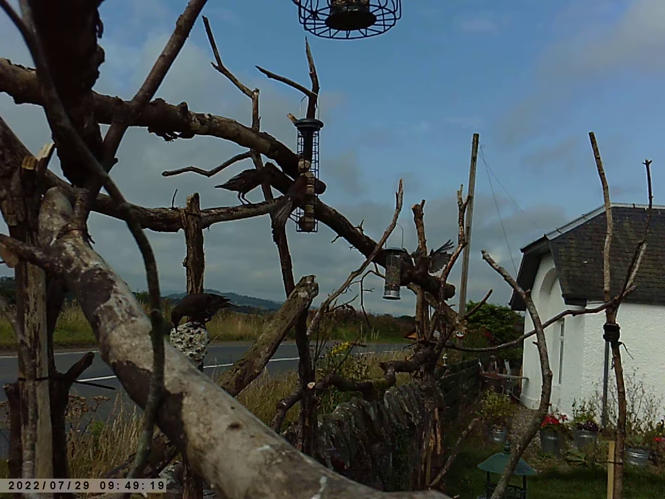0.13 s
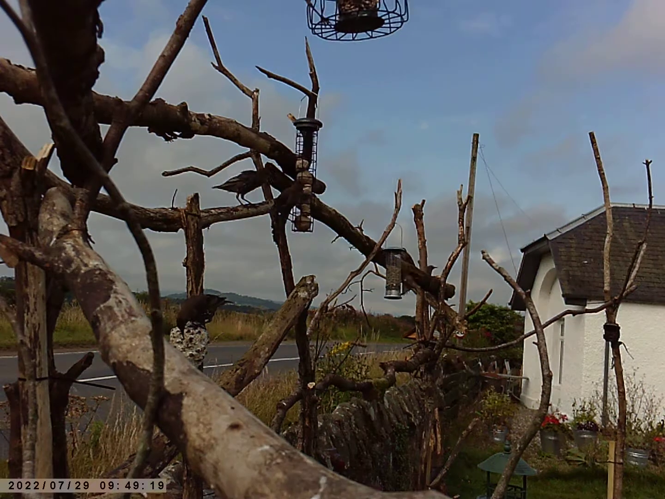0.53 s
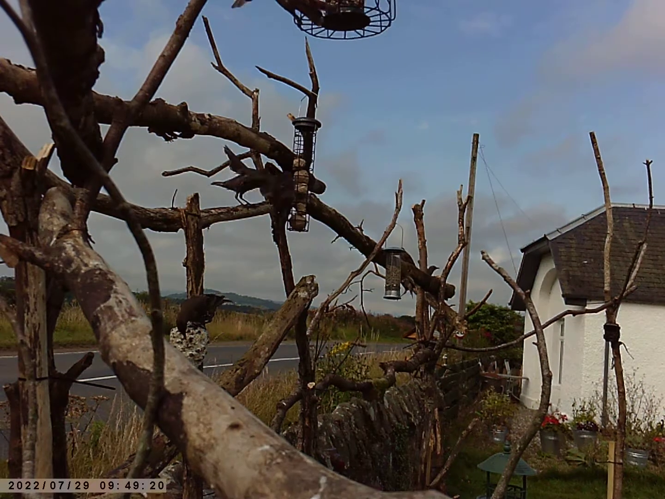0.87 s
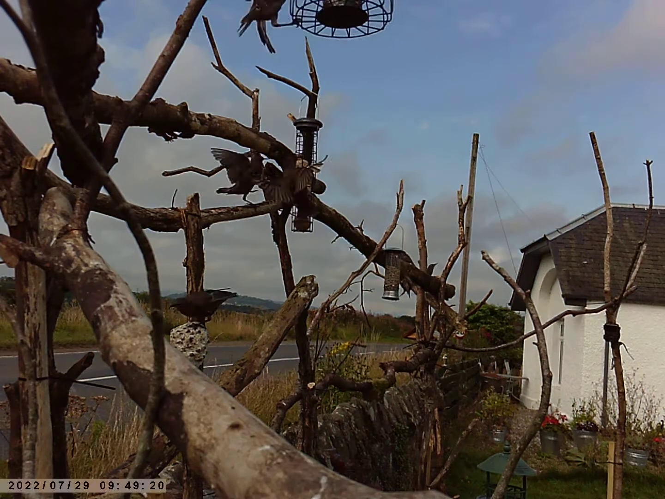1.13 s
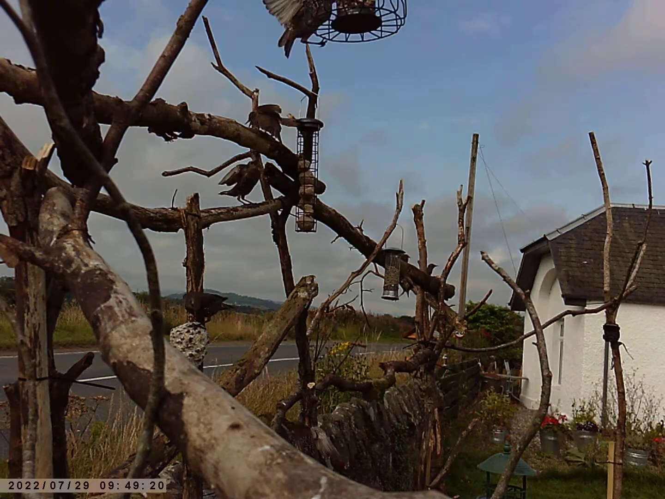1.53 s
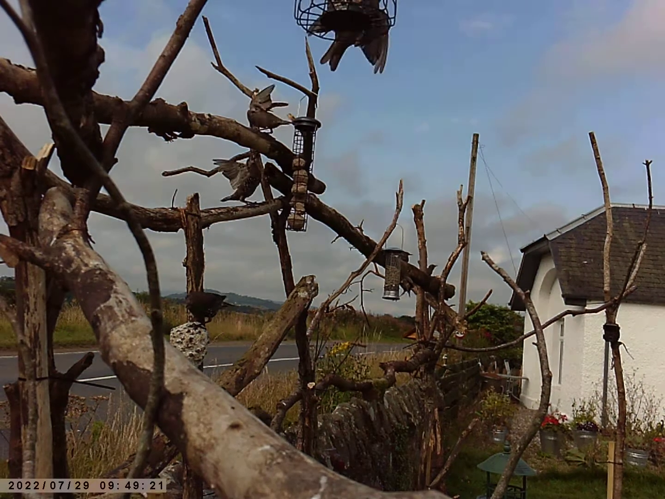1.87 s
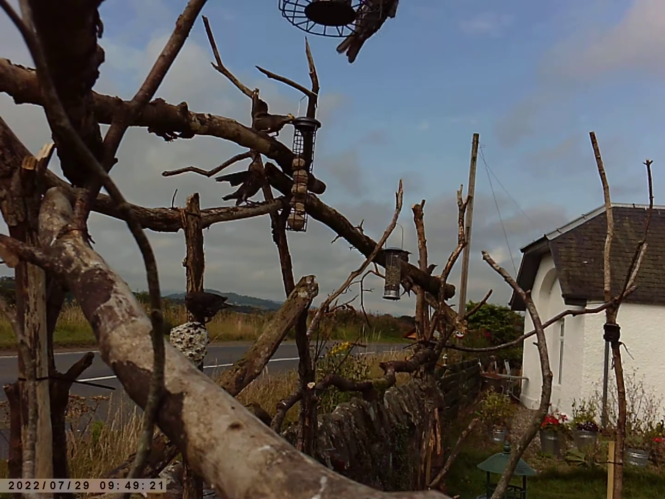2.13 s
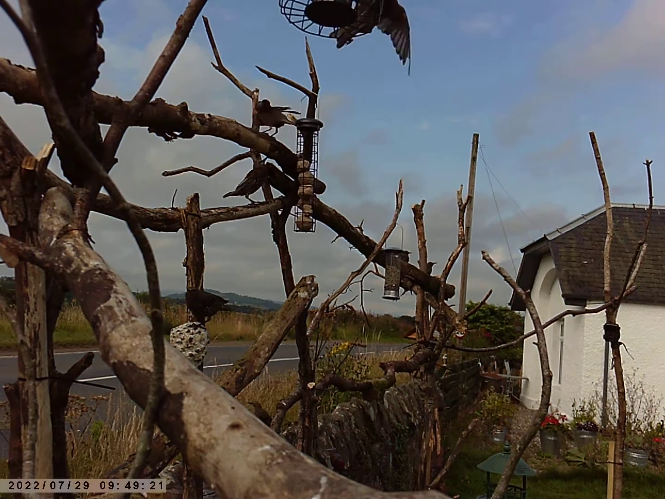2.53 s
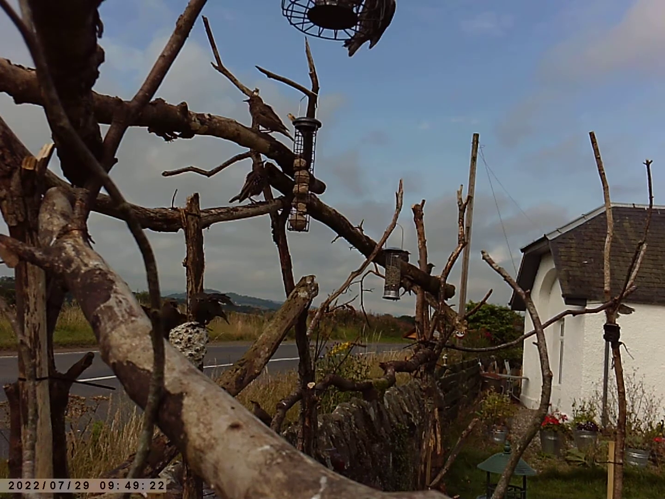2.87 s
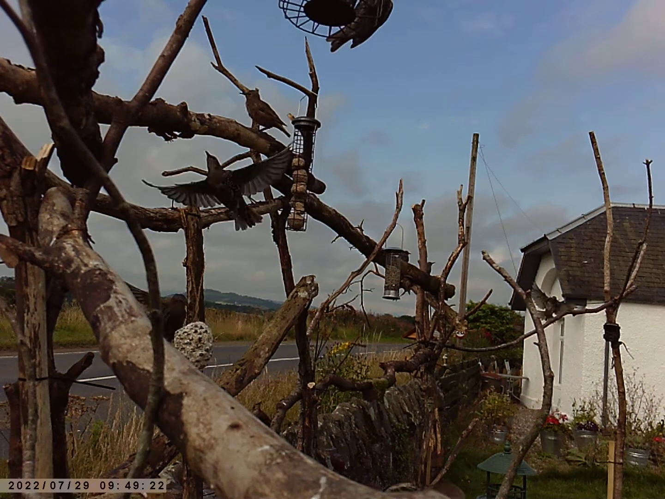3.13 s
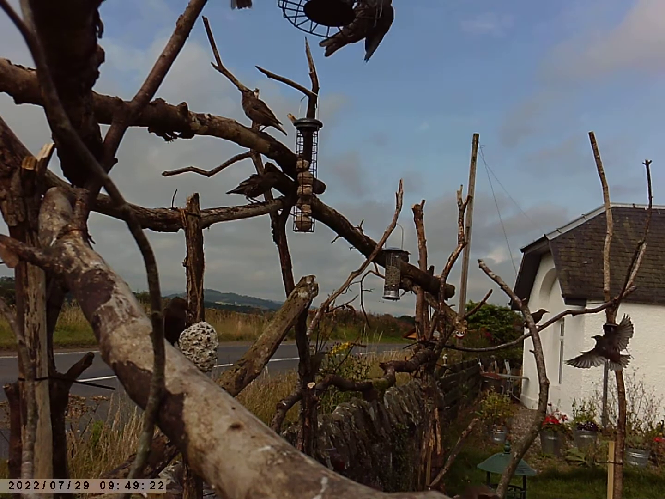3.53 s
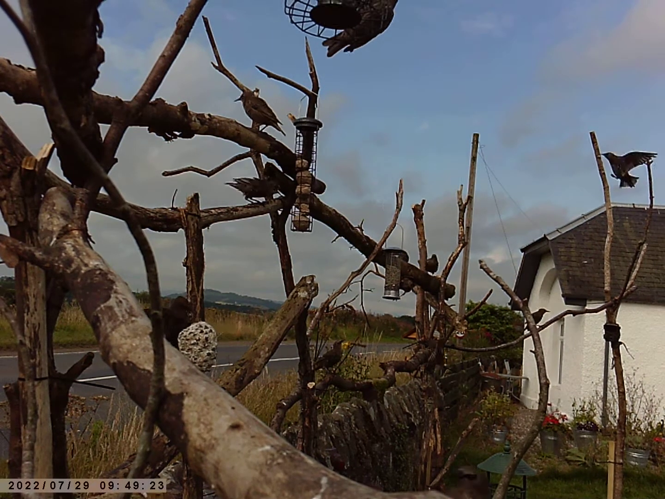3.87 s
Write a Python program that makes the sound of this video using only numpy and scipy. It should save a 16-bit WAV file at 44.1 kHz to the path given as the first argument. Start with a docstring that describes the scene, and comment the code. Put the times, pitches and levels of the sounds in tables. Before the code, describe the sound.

Starlings squeal, chatter and rasp at garden feeders over wing flutter, bumps and low wind rumble

```python
"""Starlings squabbling at a camera

Sliding, warbling squeals, scratchy chatter, rattling rasps and hoarse squawks, shaped from tones and noise;
all but the squawks ring the air resonances of a small camera's housing. Bumps and wing flutter ring modes
of its mount; puffs, rustles, ticks and wind add low pulses, noise swells and snaps.
Under it lie distant traffic, hiss and paired bursts of electrical buzz. The microphone starts with a pop."""
import sys
import numpy as np
from scipy import signal
from scipy.fft import rfft, irfft
from scipy.io import wavfile
from scipy.ndimage import uniform_filter1d

SR = 44100
rng = np.random.default_rng(int(sys.argv[2]) if len(sys.argv) > 2 else 0)


def generate_wav(signal):
    """Clip the signal to [-1, 1] and save it as 16-bit WAV at the path in sys.argv[1]."""
    frames = np.transpose(np.atleast_2d(signal))
    scaled = np.clip(frames, -1, 1) * 32767
    pcm = np.round(scaled).astype(np.int16)
    wavfile.write(sys.argv[1], SR, pcm)


N = 176400
T = np.arange(N) / SR
EDGE_HZ = 15900  # top of the recorded band
NOTE_TOP_HZ = 2470  # chatter's nominal top pitch, rasps' mean pitch

# modes of the camera mount: centre_hz, width_hz, level_db
MOUNT = [(87, 18, 3.5), (203.2, 28, 1), (247, 65, -13), (301, 46, -10), (345.5, 23, -20.5),
         (476.3, 46, -23.5)]


def amp(db):
    """Decibels to gain."""
    return 10 ** (np.asarray(db) / 20)


def unit(x):
    """Scales to rms 1."""
    return x / np.sqrt(np.mean(x ** 2) + 1e-20)


def add(mix, start_s, sound):
    """Mixes a sound in at a time, cut at the end of the mix."""
    part = mix[max(round(start_s * SR), 0):][:len(sound)]
    part += sound[:len(part)]


def level_curve(points):
    """Gain over the scene, interpolated in dB between (s, dB) points."""
    return amp(np.interp(T, *np.transpose(points)))


def noise(colour):
    """Noise of rms 1 with a spectrum given as (Hz, dB) points."""
    point_hz, point_db = np.transpose(colour)
    hz = np.fft.rfftfreq(N, 1 / SR)
    gain = amp(np.interp(np.log(hz + 1), np.log(point_hz), point_db))
    return unit(irfft(rfft(rng.standard_normal(N)) * gain, N))


def wander(size, rate_hz):
    """Smooth random motion, cut from half a second of rms 1."""
    hz = np.arange(SR // 4 + 1) * 2
    spectrum = rfft(rng.standard_normal(SR // 2)) * np.exp(-(hz / rate_hz) ** 2)
    return unit(irfft(spectrum))[:size]


def turn(hz):
    """Running phase of a pitch curve."""
    return 2 * np.pi * np.cumsum(hz) / SR


def resonate(x, hz, width_hz):
    """Fixed or moving resonance: shift to zero frequency, smooth, shift back."""
    carrier = np.exp(1j * turn(hz * np.ones(len(x))))
    pole = np.exp(-np.pi * width_hz / SR)
    return 2 * (carrier * signal.lfilter([1 - pole], [1, -pole], x / carrier)).real


def ring(x, modes):
    """Parallel peak filters, one per mode."""
    return sum(amp(db) * signal.lfilter(*signal.iirpeak(hz, hz / width_hz, SR), x)
               for hz, width_hz, db in modes)


def lowpass(x, hz, order=2):
    """Butterworth treble cut."""
    return signal.sosfilt(signal.butter(order, hz, fs=SR, output="sos"), x)


def housed(x):
    """Air resonances of the camera housing, plus a little direct sound."""
    # centre_hz, width_hz, level_db
    housing_modes = [(3630, 220, -5.5), (5094, 255, 6), (6245, 120, -4.5), (7960, 230, -12.5)]
    direct_db = -28
    return ring(x, housing_modes) + amp(direct_db) * x


def garden(x, wet_db=-20, t60_s=0.18):
    """Faint scatter from branches and a wall: convolution with a decaying noise tail."""
    t = np.arange(SR // 3) / SR
    tail = rng.standard_normal(len(t)) * amp(-60 * t / t60_s) * (t > .003)
    return x + amp(wet_db) * signal.fftconvolve(x, tail / np.linalg.norm(tail))[:N]


def air():
    """Distant traffic and steady hiss as one coloured noise."""
    # spectrum: freq_hz, level_db
    air_colour = [(59, -27), (100, 1.5), (218, -14), (370, -25.5), (429, -33), (791, -43.5), (1370, -40.5),
                  (3390, -49), (5170, -51), (15500, -61.5)]
    treble_db = -67.5  # rms of the part above 700 Hz
    x = noise(air_colour)
    treble = signal.sosfilt(signal.butter(6, 700, "high", fs=SR, output="sos"), x)
    return amp(treble_db) * x / treble.std()


def buzz():
    """The camera's electronics: harmonics and hiss gated in two bursts per cycle."""
    # spectrum: freq_hz, level_db
    buzz_colour = [(700, 12), (2500, -7), (3500, 9.5), (4400, -2), (6500, 3), (9000, -3), (15000, -1)]
    starts_s, cycle_s, burst_s = (.547, 0.75), .6667, .1
    base_hz, lines_db, hiss_db = 692, -70, -66.5
    gate = sum((T > s) * ((T - s) % cycle_s < burst_s) for s in starts_s)
    lines = np.zeros(N)
    for k in range(2, 22):
        gain = amp(np.interp(k * base_hz, *np.transpose(buzz_colour)))
        lines += gain * np.sin(2 * np.pi * (k * base_hz * T + rng.random()))
    return gate * (amp(lines_db) * unit(lines) + amp(hiss_db) * noise(buzz_colour))


def wind():
    """Wind on the microphone: low coloured noise that swells and sinks."""
    # time_s, level_db before trim
    wind_points = [(0.15, -24.5), (0.66, -24), (1.04, -18.5), (1.3, -25), (1.46, -38), (2.5, -36.5),
                   (2.72, -28.5), (3.17, -40.5), (3.5, -32.5), (3.86, -31)]
    # spectrum: freq_hz, level_db
    wind_colour = [(15, 0.5), (30, -7), (60, 0.5), (88, 4.5), (125, -13), (180, -18), (400, -56.5),
                   (900, -79)]
    trim_db = -1.5
    return amp(trim_db) * level_curve(wind_points) * noise(wind_colour)


def flutter():
    """Wing flutter shaking the mount: unevenly beating noise plus noise-driven modes."""
    # time_s, level_db before the shares below
    flutter_points = [(0.11, -27), (0.29, -51.5), (0.4, -40), (0.57, -53.5), (0.82, -34), (1.22, -30),
                      (1.4, -41.5), (1.54, -35), (1.69, -44), (1.8, -31), (1.98, -46.5), (2.2, -36),
                      (2.35, -45), (2.6, -37), (2.97, -45.5), (3.22, -58), (3.26, -37.5), (3.6, -34),
                      (3.97, -36.5)]
    # spectrum: freq_hz, level_db
    flutter_colour = [(40, 3.5), (150, 5), (240, 0), (380, -16), (520, -21.5), (800, -37.5), (1500, -39.5),
                      (4000, -62)]
    noise_db, boom_db = -5, -3
    uneven_db, uneven_cutoff_hz = 5, 26.1
    beats = unit(lowpass(rng.standard_normal(N), uneven_cutoff_hz, order=4))
    force = rng.standard_normal(N)
    boom = np.zeros(N)
    for hz, width_hz, db in MOUNT:
        boom += amp(db) * unit(resonate(resonate(force, hz, width_hz), hz, width_hz))
    beating = amp(noise_db + uneven_db * beats) * noise(flutter_colour)
    return level_curve(flutter_points) * (beating + amp(boom_db) * unit(boom))


def drone():
    """A bird settles on the mount; its modes hum on with wandering level and pitch."""
    # freq_hz, level_db before the shake level
    drone_modes = [(92, 1.5), (204, -4.5), (349, -12.5), (472, -25.5)]
    start_s, shake_db, t60_s, rise_s = 3.575, -24, 2.5, 0.0077
    t = np.arange(0, min(T[-1] - start_s + .02, .49), 1 / SR)
    hum = np.zeros(len(t))
    for hz, db in drone_modes:
        swell = 1 + .5 * wander(len(t), 24)
        hum += amp(db) * swell * np.sin(turn(hz + 9 * wander(len(t), 51)))
    return start_s, hum * np.minimum(t / rise_s, 1) * amp(shake_db - 60 * t / t60_s)


def rustle(middle_s, half_length_s, db, hz, order=4):
    """Feathers brushing past: a soft swell of band-limited noise."""
    spread = 1.312  # band edges as ratios over and under the centre
    t = np.arange(-half_length_s, half_length_s, 1 / SR)
    band = signal.butter(order, [hz / spread, hz * spread], "band", fs=SR, output="sos")
    # first half lets the filter settle
    rush = signal.sosfilt(band, rng.standard_normal(2 * len(t)))[len(t):]
    swell = np.cos(np.pi * t / half_length_s / 2) ** 2
    return middle_s - half_length_s, amp(db) * unit(rush * swell) * np.sqrt(.5)


def puff(middle_s, half_length_s, db, hz):
    """Air pressure from a wing beat: a low cosine under a smooth bell."""
    trim_db = 1.5
    t = np.arange(-half_length_s, half_length_s, 1 / SR)
    bell = np.cos(np.pi * t / half_length_s / 2) ** 4
    return middle_s - half_length_s, amp(db + trim_db) * bell * np.cos(2 * np.pi * hz * t)


def tick(start_s, db):
    """Claw or beak: a tiny hard snap with a noisy tail, heard direct and through the housing."""
    t = np.arange(300) / SR
    snap = np.exp(-t / .00006) + 0.089 * np.exp(-t / 0.00045) * rng.standard_normal(len(t))
    return start_s, amp(db) * (snap + housed(snap))


def bump(time_s, db, hz):
    """Bird bumping the mount: a sine thud with a dull noise scuff, ringing its modes."""
    rise_s, ring_db, scuff_db = 0.0049, -23, -17.5
    t = np.arange(SR // 5) / SR
    shape = t / rise_s * np.exp(1 - t / rise_s)
    scuff = shape * unit(lowpass(rng.standard_normal(len(t)), 430, order=3))
    thud = shape * np.sin(2 * np.pi * hz * t) + amp(scuff_db) * scuff
    return time_s - .004, amp(db) * (thud + amp(ring_db) * ring(thud, MOUNT))


def squawk(start_s, length_s, first_hz, last_hz, db):
    """A quavering tone slides alongside rasping noise that rings a sliding throat resonance."""
    width_hz, hiss_db, trim_db = 560, -11, 5.5
    u = np.linspace(0, 1, int(length_s * SR))
    breath = rng.standard_normal(len(u)) * amp(2.1 * wander(len(u), 200))
    hz = first_hz + (last_hz - first_hz) * u
    throat = unit(resonate(resonate(breath, hz, width_hz), hz, width_hz))
    hiss = amp(hiss_db) * unit(lowpass(breath, 4000))
    tone = 2 * np.sin(turn(hz * (1 + .035 * wander(len(u), 300))))
    swell = np.sqrt(abs(np.sin(np.pi * u)))
    return start_s, amp(db + trim_db) * unit((throat + hiss + tone) * swell)


def rasp(start_s, length_s, db):
    """Hoarse rattle: uneven pulses of breath and a lurching tone through throat and housing."""
    # centre_hz, width_hz, level_db
    throat_modes = [(1370, 330, -5), (2460, 470, -6)]
    pulses_per_s, pulse_uneven, pitch_swing, spray_db = 130, .3, 0.077, -29
    u = np.linspace(0, 1, int(length_s * SR))
    pulses = np.exp(np.cos(turn(pulses_per_s * (1 + pulse_uneven * wander(len(u), 200)))))
    phase = turn(NOTE_TOP_HZ * (1 + pitch_swing * wander(len(u), 284)))
    tone = .5 * (np.sin(phase) + np.sin(2 * phase))
    breath = pulses * (rng.standard_normal(len(u)) + tone)
    voice = housed(breath) + ring(breath, throat_modes) + amp(spray_db) * breath
    return start_s, amp(db) * unit(voice * np.sqrt(abs(np.sin(np.pi * u))))


def note(start_s, length_s, db):
    """Scratchy chatter: an arched, sagging pitch whose strong second harmonic rings the housing."""
    # one entry per harmonic from the first: level_db
    harmonics = [-5, 0, -19.5, -27]
    scatter, arch_depth, sag, jitter = 0.051, 0.205, 0.11, 0.067  # shares of pitch
    noise_gain, rattle_db = 0.47, 4.5
    u = np.linspace(0, 1, int((length_s + 0.0059) * SR))
    arch = np.sin(np.pi * u)
    top_hz = NOTE_TOP_HZ * (1 + scatter * rng.uniform(-0.96, 1))
    bend = 1 - arch_depth * (1 - arch) - sag * (u - .5) + jitter * wander(len(u), 400)
    phase = turn(top_hz * bend)
    voice = noise_gain * rng.standard_normal(len(u))
    for k, harmonic_db in enumerate(harmonics, 1):
        voice += amp(harmonic_db) * np.sin(k * phase)
    rattle = amp(rattle_db * wander(len(u), 520))
    return start_s - .003, amp(db) * unit(housed(voice * arch * rattle))


def squeal(warble_hz, harsh_s, points):
    """A sliding whistle: harsh onset, then clear and warbling, rougher again near its top pitch."""
    rough_start, rough_clear, rough_high, strain_hz = .85, 0.14, 0.58, 8350  # roughness 0-1
    warble_per_s, warble_uneven = 92, .14
    jitter_hz, rough_jitter_hz = 45.5, 900
    edge_s, overtone_db, trim_db = 0.0019, -31, -0.5
    point_s, point_hz, point_db = np.transpose(points)
    t = np.arange(point_s[0], point_s[-1], 1 / SR)
    n = len(t)
    glide_hz = np.interp(t, point_s, point_hz)
    harsh = rough_start * np.clip((t[0] + harsh_s - t) / 0.0041 + .5, 0, 1)
    strain = rough_clear + rough_high * (glide_hz / strain_hz) ** 10
    rough = np.clip(np.maximum(harsh, strain), 0, 1)
    warble = np.sin(turn(warble_per_s * (1 + warble_uneven * wander(n, 60))))
    pitch_hz = glide_hz + warble_hz * (1 - rough) * warble
    pitch_hz += jitter_hz * wander(n, 300) + rough_jitter_hz * rough ** 2 * wander(n, 1100)
    phase = turn(pitch_hz)
    voice = housed((1 - 0.43 * rough) * np.sin(phase) + 0.92 * rough * rng.standard_normal(n))
    # even out the resonances so the level curve rules
    voice /= np.sqrt(abs(uniform_filter1d(voice ** 2, size=600)) + 1e-12)
    overtone = amp(overtone_db) * np.sin(2 * phase) * (pitch_hz < EDGE_HZ / 2)
    edge = np.clip(np.minimum(t - t[0], t[-1] - t) / edge_s, 0, 1)
    level = amp(np.interp(t, point_s, point_db) + trim_db + 1.26 * wander(n, 160))
    return point_s[0], edge * level * (voice + overtone)


def scene():
    """Background, knocks and wing sounds, and birds with a faint garden echo."""
    # feathers brushing past: middle_s, half_length_s, level_db before a 3 dB cut, centre_hz
    rustles = [(0.482, 0.03, -52.5, 417), (0.677, 0.032, -45.5, 289), (1.15, 0.063, -41, 290),
               (1.526, 0.048, -50, 440), (3.061, .06, -44.5, 251), (3.414, .06, -31.5, 199.4),
               (3.494, .06, -36, 227)]
    # wing-beat puffs: middle_s, half_length_s, level_db before trim, pitch_hz
    puffs = [(.084, 0.038, -8.5, 61.6), (.21, 0.031, -21.5, 89), (0.362, 0.046, -25, 64.3),
             (.54, 0.057, -18.5, 88.6), (0.787, 0.028, -12, 44), (0.829, 0.024, -13, 81),
             (0.964, 0.051, -7.5, 48.3), (1.195, 0.068, -13.5, 88.4), (1.185, 0.045, -18.5, 201),
             (2.22, 0.083, -29, 135), (2.385, 0.022, -23, 59.3), (2.58, 0.039, -21.5, 84)]
    # claw and beak ticks: start_s, snap_level_db
    ticks = [(.947, -36), (0.97, -31), (0.9745, -32.5), (2.293, -41)]
    # birds bumping the camera mount: time_s, level_db, thud_pitch_hz
    bumps = [(.076, -26.5, 233.7), (.344, -34.5, 319), (1.042, -22.5, 197), (1.171, -23.5, 227),
             (1.439, -26, 183), (1.745, -27, 201), (2.451, -30, 220), (3.586, -22, 202.3)]
    # squawks: start_s, length_s, first_centre_hz, last_centre_hz, level_db before trim
    squawks = [(0.292, 0.016, 1276, 1380, -65.5), (0.747, 0.019, 3600, 3580, -70.5),
               (0.803, 0.028, 1213, 1510, -66), (0.87, 0.016, 1190, 1400, -62.5),
               (1.624, 0.038, 1066, 2580, -67), (1.855, .025, 3670, 4100, -72),
               (1.946, 0.036, 1170, 2260, -69.5), (2.513, 0.04, 1690, 1970, -66.5),
               (2.578, 0.072, 2420, 2140, -74), (2.636, 0.038, 945, 1440, -66),
               (2.687, 0.042, 4450, 4740, -70.5), (2.709, 0.025, 1250, 1550, -65.5),
               (2.717, .026, 3710, 3490, -71.5), (2.877, 0.032, 2500, 2390, -69),
               (2.936, 0.065, 2200, 2560, -71.5), (3.044, 0.062, 3500, 3640, -71.5),
               (3.496, 0.056, 1260, 1920, -72.5), (3.567, 0.083, 2580, 2420, -74),
               (3.625, 0.047, 1182, 1914, -66.5), (3.638, 0.046, 2460, 3150, -70),
               (3.811, 0.036, 1190, 1710, -67)]
    # rattling rasps: start_s, length_s, level_db
    rasps = [(1.587, 0.066, -68), (1.63, .08, -58), (1.734, 0.063, -64), (2.52, 0.18, -69),
             (2.875, 0.096, -62), (2.97, 0.085, -62.5), (3.639, 0.039, -61), (3.689, 0.038, -60),
             (3.76, .045, -64)]
    # chatter notes: nominal start_s, nominal length_s, level_db
    chatter = [(1.638, .015, -51), (1.671, 0.01, -57), (1.689, 0.0133, -51), (1.704, 0.011, -57),
               (1.722, .012, -49.5), (1.759, 0.0078, -64), (1.806, 0.0083, -60), (2.744, 0.015, -70),
               (2.884, 0.017, -61), (2.926, 0.015, -57.5), (2.974, .012, -55.5), (2.984, 0.02, -56),
               (3.007, 0.019, -54.5)]
    # squeals: warble_depth_hz, harsh_onset_s, [(time_s, pitch_hz, level_db before trim), ..]
    squeals = [(60, 0.000089, [(0.078, 7300, -42), (0.087, 6830, -57), (0.11, 8500, -57),
               (0.147, 7260, -61.5)]), (400, 0.031, [(0.22, 5210, -61.5), (0.275, 5580, -57.5),
               (0.285, 5230, -65), (0.32, 5100, -71)]), (130, 0.02, [(0.352, 8460, -64),
               (0.374, 6900, -61.5), (0.384, 6380, -50.5), (0.404, 6270, -44.5), (0.415, 6300, -57),
               (0.435, 7930, -63), (0.457, 6300, -54), (0.472, 6400, -70.9)]),
               (50, 0.022, [(0.868, 5440, -54.5), (0.882, 6630, -56), (0.901, 6100, -50),
               (0.912, 6600, -56), (0.926, 6470, -53)]), (80, 0.0023, [(0.93, 5090, -56),
               (0.944, 6270, -57), (0.965, 5930, -55), (0.979, 6260, -50.5), (0.992, 7000, -59.5),
               (1.012, 8350, -57.5), (1.04, 6200, -59)]), (607, 0.088, [(1.17, 6000, -57.5),
               (1.194, 8200, -57), (1.212, 6450, -54), (1.226, 6110, -45), (1.24, 5510, -39),
               (1.262, 5500, -41), (1.274, 4330, -49.5), (1.295, 3040, -68)]),
               (450, 0.0077, [(1.303, 3530, -62), (1.318, 4650, -52), (1.329, 5060, -43),
               (1.337, 6000, -46), (1.351, 5580, -44.5), (1.361, 3930, -54)]),
               (405, 0.0031, [(1.462, 5500, -64), (1.481, 7740, -64), (1.501, 6220, -50.5),
               (1.52, 5730, -44), (1.531, 5050, -41), (1.541, 4420, -49), (1.554, 3800, -78)]),
               (120, 0.011, [(1.948, 7000, -56), (1.971, 8000, -55), (1.989, 6560, -56), (2.008, 5920, -55),
               (2.018, 6270, -47)]), (328, 0.015, [(2.02, 5860, -57), (2.035, 6830, -54),
               (2.047, 5900, -49.5), (2.067, 5900, -51), (2.087, 5120, -48), (2.1, 5840, -51),
               (2.134, 5300, -51), (2.176, 6230, -56.3), (2.188, 5400, -59)]),
               (190, 0.03, [(2.385, 7280, -57.5), (2.408, 7920, -61.5), (2.439, 6340, -53),
               (2.461, 5240, -54), (2.484, 5800, -64), (2.505, 5000, -60), (2.522, 4630, -63)]),
               (260, 0.032, [(3.098, 6000, -60), (3.122, 7120, -56.5), (3.152, 5360, -61),
               (3.161, 4040, -46), (3.17, 5580, -55), (3.179, 4050, -61), (3.198, 4800, -55),
               (3.212, 5650, -51), (3.235, 4000, -65)]), (380, 0.04, [(3.818, 7000, -63),
               (3.839, 8180, -60.5), (3.855, 6850, -62), (3.866, 6050, -53.5), (3.896, 5840, -56.5),
               (3.912, 6300, -56), (3.924, 7300, -55), (3.933, 6480, -52.5), (3.946, 5090, -50),
               (3.954, 4620, -72)])]
    birds, knocks = np.zeros(N), np.zeros(N)
    for mix, source, table in ((knocks, rustle, rustles), (knocks, puff, puffs),
                               (knocks, tick, ticks), (knocks, bump, bumps),
                               (birds, squawk, squawks), (birds, rasp, rasps),
                               (birds, note, chatter), (birds, squeal, squeals)):
        for row in table:
            add(mix, *source(*row))
    add(knocks, *drone())
    return (air() + buzz() + wind() + flutter() + knocks + garden(birds))[None]


def record(dry):
    """The microphone switches on from silence with a decaying pop; then the band limit."""
    switch_on_s, pop_db, pop_s = .0722, -15, 0.0022
    since_s = T - switch_on_s
    pop = (since_s > 0) * amp(pop_db) * np.exp(-abs(since_s) / pop_s)
    live = np.clip(since_s / pop_s, 0, 1) * dry - pop
    band = signal.firwin(511, EDGE_HZ, window=("kaiser", 9), fs=SR)
    return signal.oaconvolve(live, band[None], "same")


dry = scene()
out = record(dry)
generate_wav(out)
```